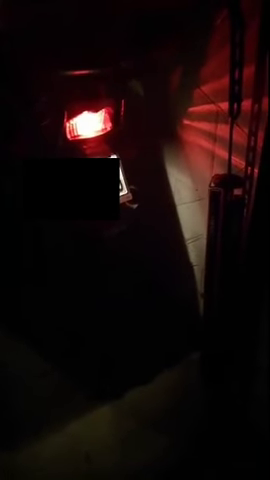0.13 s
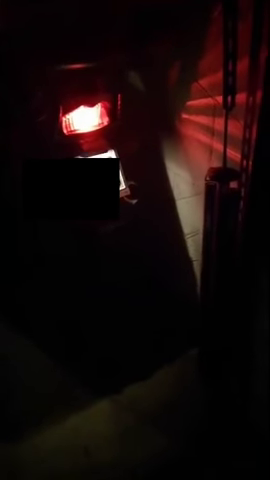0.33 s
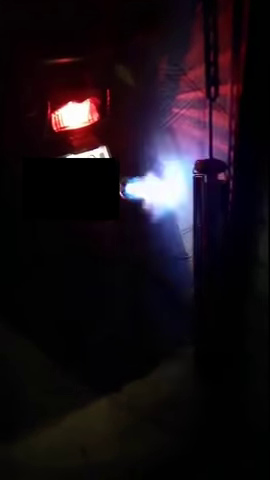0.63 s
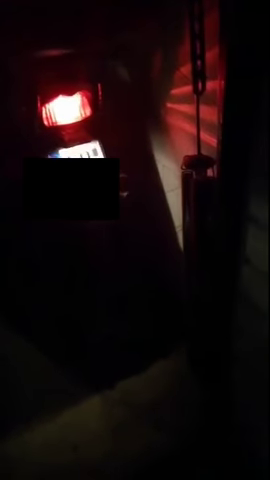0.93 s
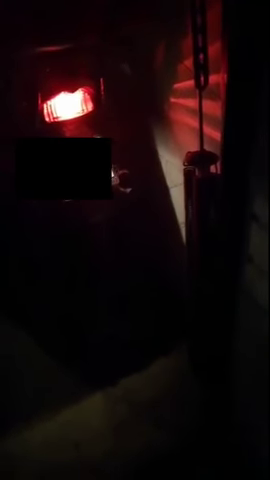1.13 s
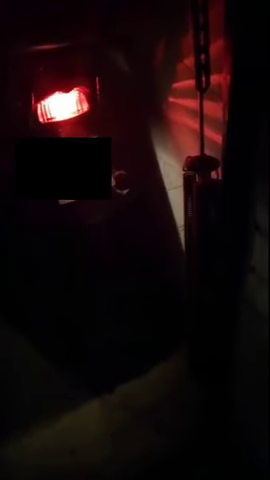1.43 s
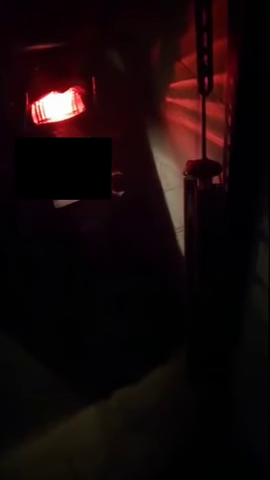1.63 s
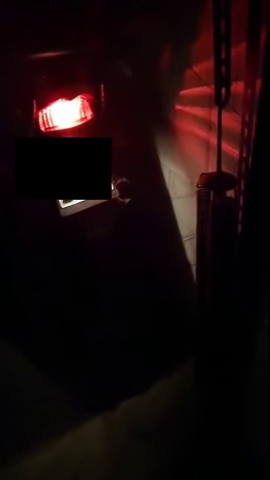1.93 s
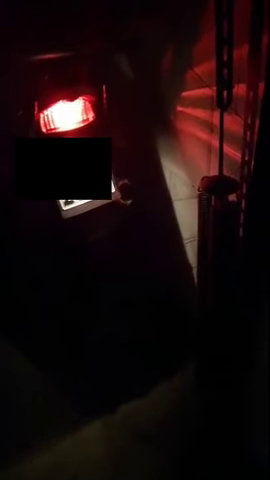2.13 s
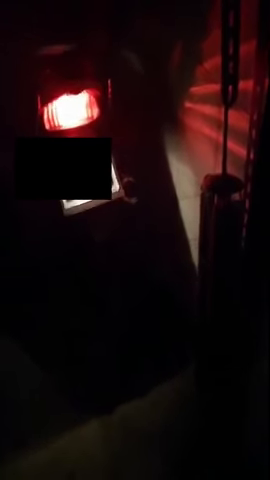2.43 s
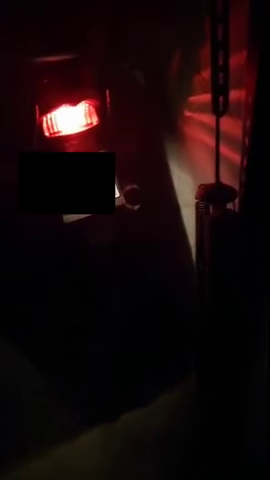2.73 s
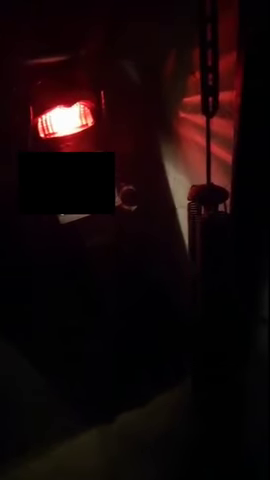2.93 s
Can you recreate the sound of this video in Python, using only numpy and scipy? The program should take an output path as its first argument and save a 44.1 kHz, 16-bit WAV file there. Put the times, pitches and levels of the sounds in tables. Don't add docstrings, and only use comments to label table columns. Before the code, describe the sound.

A four-cylinder motorcycle snarls through four quick revs with sharp exhaust pops in a hard-walled passage

```python
import sys
import numpy as np
from scipy import signal
from scipy.fft import rfft, irfft, next_fast_len
from scipy.io import wavfile
from scipy.ndimage import uniform_filter1d

SR = 44100
rng = np.random.default_rng(int(sys.argv[2]) if len(sys.argv) > 2 else 0)


def wav_out(sig):
    wavfile.write(sys.argv[1], SR, np.round(np.clip(np.atleast_2d(sig).T, -1, 1) * 32767).astype(np.int16))


def convert_level_to_amplitude(level_db):
    exponent = np.asarray(level_db, float) / 20
    return 10 ** exponent


N = 136710
HZ = np.fft.rfftfreq(next_fast_len(N + SR // 2), 1 / SR)
MID_HZ = 287.6

# throttle_opens_s, start_speed_hz, top_speed_hz, extra_strength_near_top_db, burble_returns_s
REVS = [
    (.08, 194.3, 361.3, 1.2, 0.47),
    (.935, 212.7, 360, -0.5, 1.25),
    (1.75, 215.8, 371.7, 5, 2.15),
    (2.53, 219, 378.3, 7, 2.2),
]
# pitch_hz, width_hz, level_db
PIPE_MODES = [(95, 31, -7.5), (172.8, 23, -3), (234.6, 40.7, 1.64), (290.3, 59.3, 1), (339.5, 65.6, 1),
              (465.7, 75, 4.5), (677, 72, -5.5), (799, 99, 1), (922, 113, -1), (1034, 146, -2.5),
              (1305, 310, -1), (1593, 290, -0.5), (1830, 190, -0.5), (2103, 540, -3.5)]
# pitch_hz, level_db
ROAR_COLOUR = [(300, -2.5), (600, -26), (1000, -6.5), (1400, 6.3), (2000, -6.5), (2400, 2.5), (3500, -7.5),
               (6000, -11.5)]
# pitch_hz, level_db
HISS_COLOUR = [(300, -32), (500, 4), (1000, 7), (2200, 10), (3000, 1.5), (4200, 4.5), (5500, -4)]
# start_s, peak_db, crack_db, thump_db (crack and thump relative to the peak)
GAS_POPS = [(0.028, -44.5, -18, 13), (0.068, -22.5, -23, 1.5), (0.558, -11, -6, -35),
            (.586, -0.5, -8.5, -4.5), (0.606, -15, -31, -4), (0.905, -15, -4.5, -25.5),
            (1.266, -4, -0.5, -19.5), (1.292, -11.5, -3.5, -12), (1.323, -2.5, 6, -15.5),
            (1.515, -6.5, -0.5, -27), (1.671, -11, -4.5, -15), (1.726, -10, -3, -12.5),
            (2.172, -7.5, -15, -10), (2.181, -1, -5.5, -10), (2.205, -24, -6, -10), (2.28, -9, -1, -16.5),
            (2.381, -35.5, -10, -16), (2.427, -13, -19, -18), (2.499, -9, -20.5, -19),
            (2.923, -3, 7.5, -28.5), (3.019, -2.5, 2, -20.5)]
# pitch_hz, time_to_fall_60_db_s
ECHO_TIMES = [(100, 0.11), (400, 0.11), (1500, 0.41), (5000, 0.56)]
# pitch_hz, level_db
ECHO_COLOUR = [(60, -16.5), (150, -43.5), (300, -10), (700, 0), (2000, -2.5), (5000, 3.5)]


def evened(x):
    return x / np.sqrt(np.mean(x ** 2) + 1e-20)


def read(points, hz):
    f, value = np.transpose(points)
    return np.interp(np.log(hz + 1), np.log(f + 1), value)


def colour(x, response):
    n = next_fast_len(N + SR // 2)
    return irfft(rfft(x, n) * response, n)[..., :N]


def drift(seconds):
    size = max(round(seconds * SR), 2)
    once = uniform_filter1d(rng.standard_normal(N), size)
    return evened(uniform_filter1d(once, size))


def ramp(t, start, length):
    return np.sin(np.pi / 2 * np.clip((t - start) / length, 0, 1)) ** 2


def lagging(x, seconds):
    keep = np.exp(-1 / (seconds * SR))
    return signal.lfilter([1 - keep], [1, -keep], x)


def controls():
    first_hz, last_hz = 204.2, 270.4
    rise_s, sag_s, near_top_s = 0.24, 0.66, 0.078
    lead_s, hold_s, open_s, shut_s = 0.015, 0.18, 0.07, 0.06
    cut_delay_s, cut_fade_s, return_fade_s = 0.058, 0.014, 0.059
    t = np.arange(N) / SR
    hz = np.interp(t, [0, REVS[0][0]], [first_hz, REVS[0][1]])
    ends = [row[:2] for row in REVS[1:]] + [(N / SR, last_hz)]
    load, push_db, cut = np.zeros(N), np.zeros(N), np.zeros(N)
    for (start, low_hz, top_hz, extra_db, back), (end, end_hz) in zip(REVS, ends):
        top = start + rise_s
        sag = np.expm1(-np.maximum(t - start - rise_s, 0) / sag_s) / np.expm1(-(end - start - rise_s) / sag_s)
        speed = low_hz + (top_hz - low_hz) * ramp(t, start, rise_s) + (end_hz - top_hz) * sag
        hz = np.where(t >= start, speed, hz)
        shut = ramp(t, start + hold_s - lead_s, shut_s)
        load += ramp(t, start - lead_s, open_s) * (1 - shut)
        push_db += extra_db * np.exp(-((t - top) / near_top_s) ** 2)
        cut += ramp(t, start + hold_s + cut_delay_s, cut_fade_s) * (1 - ramp(t, back, return_fade_s))
    hz = uniform_filter1d(hz, size=SR // 25, mode="nearest")
    return hz, load, push_db, cut


def firing(hz, load, bloom, push_db, turns):
    tone_shut_db, tone_open_db, wobble_db = -18, -8.5, 2.5
    tilt_shut_db, tilt_open_db, sharp_db_per_oct = -17, -3.5, 19
    half_db, half_fade_db, quarter_db = -12.5, -1.2, -21
    shut_db = tilt_shut_db + sharp_db_per_oct * np.log2(hz / MID_HZ)
    tilt = np.log2(convert_level_to_amplitude(shut_db + (tilt_open_db - shut_db) * bloom ** 0.24))
    out = np.zeros(N)
    for k in np.r_[.25:3:.25, 3:9:.5]:
        if k % 1 == 0:
            db = 0
        elif k % 0.5 == 0:
            db = half_db + half_fade_db * k
        else:
            db = quarter_db
        phase = k * turns + (k % 1 > 0) * rng.random()
        out += convert_level_to_amplitude(db) * np.exp(tilt * np.log(max(k, 1))) * np.cos(2 * np.pi * phase)
    level_db = tone_shut_db + (tone_open_db - tone_shut_db) * load ** 0.6
    level_db = level_db + push_db + wobble_db * drift(0.011)
    return out * convert_level_to_amplitude(level_db) * np.sqrt(2)


def pipe():
    response = 0
    for k, (f, width, db) in enumerate(PIPE_MODES):
        mode = 1j * HZ * width / (f * f - HZ * HZ + 1j * HZ * width)
        response = response + (-1) ** k * convert_level_to_amplitude(db) * mode
    return response


def howl(hz, turns):
    level_db, db_per_oct, tilt_db, waver_db = -25.5, 26, -1.2, 3.0
    out = np.zeros(N)
    for k in range(2, 8):
        strength = convert_level_to_amplitude(tilt_db * k + waver_db * drift(0.018))
        out += strength * np.cos(2 * np.pi * (k * turns + rng.random()))
    return out * convert_level_to_amplitude(level_db + db_per_oct * np.log2(hz / 340))


def roar(hz, load, turns):
    shut_db, open_db, db_per_oct, flicker_db = -28.5, -17, 18, 2.5
    puff_share = 0.51
    gate = 1 - puff_share + puff_share * 3 * np.exp(-(turns % 1) / 0.33)
    puffs = gate * rng.standard_normal(N) * convert_level_to_amplitude(flicker_db * drift(0.0041))
    db = shut_db + (open_db - shut_db) * load
    db = db + db_per_oct * np.log2(hz / MID_HZ) * (1 - 0.43 * load)
    return evened(colour(puffs, convert_level_to_amplitude(read(ROAR_COLOUR, HZ)))) * convert_level_to_amplitude(db)


def hiss(hz):
    level_db, db_per_oct, lag_s, flicker_db = -27, 18, 0.017, 1.8
    octaves = lagging(np.log2(hz / hz[0]), lag_s) + np.log2(hz[0] / MID_HZ)
    noise = rng.standard_normal(N) * convert_level_to_amplitude(flicker_db * drift(0.0067))
    noise = colour(noise, convert_level_to_amplitude(read(HISS_COLOUR, HZ)))
    return evened(noise) * convert_level_to_amplitude(level_db + db_per_oct * octaves)


def burble(load, cut):
    level_db, open_db, cut_db, spread_db = -25, 2, -32, 2.8
    kicks_per_s, soft_above_hz = 140, 352
    sizes = convert_level_to_amplitude(spread_db * np.minimum(rng.exponential(1, N), 4))
    kicks = (rng.random(N) < kicks_per_s / SR) * sizes * rng.choice([-1, 1], N)
    low = colour(kicks + 0.03 * rng.standard_normal(N), 1 / (1 + 1j * HZ / soft_above_hz) ** 2)
    return evened(low) * convert_level_to_amplitude(level_db + cut_db * cut + open_db * load)


def pops():
    pulse_s, crack_s, thump_s = 0.00041, 0.0028, 0.011
    crack_low_hz, crack_high_hz, thump_hz = 500, 2300, 59
    blow, air = np.zeros(N + SR), np.zeros(N + SR)
    t = np.arange(SR // 10) / SR
    u = t / pulse_s
    b, a = signal.butter(2, [crack_low_hz, crack_high_hz], "band", fs=SR)
    noises = evened(signal.lfilter(b, a, rng.standard_normal((len(GAS_POPS), len(t)))))
    pulse = 2.51 * u * np.exp(1 - u)
    thump = np.sin(2 * np.pi * thump_hz * t) * np.exp(-t / thump_s)
    for (start, db, crack_db, thump_db), noise in zip(GAS_POPS, noises):
        first = round(start * SR)
        at = slice(first, first + len(t))
        crack = 0.6 * noise * np.exp(-t / crack_s) * np.minimum(u, 1)
        blow[at] += convert_level_to_amplitude(db) * pulse
        air[at] += convert_level_to_amplitude(db + thump_db) * thump
        air[at] += convert_level_to_amplitude(db + crack_db) * crack
    return blow[:N], air[:N]


def passage(x):
    taps = np.zeros((2, SR // 2))
    at = np.arange(200, SR // 2 - 20, 20) + rng.integers(0, 20, (2, (SR // 2 - 201) // 20))
    np.put_along_axis(taps, at, rng.choice([-1., 1.], at.shape), 1)
    hz, t, z = signal.stft(taps, SR, nperseg=256)
    fade = convert_level_to_amplitude(-60 * t / read(ECHO_TIMES, hz)[:, None])
    tail = signal.istft(z * fade, SR, nperseg=256)[1]
    tail = tail / np.linalg.norm(tail[0])
    wet = signal.fftconvolve(x[None], tail, axes=1)[:, :N]
    return colour(wet, convert_level_to_amplitude(read(ECHO_COLOUR, HZ)))


def scene():
    hz, load, push_db, cut = controls()
    bloom = np.minimum(load, lagging(load, 0.045))
    turns = np.cumsum(hz * (1 + 0.004 * drift(0.005))) / SR
    blow, air = pops()
    stumble = convert_level_to_amplitude(-0.36 * np.maximum(222.3 - hz, 0) * (1 - load))
    misfires = burble(load, cut) * stumble ** 0.75
    pulses = firing(hz, load, bloom, push_db, turns) * stumble
    piped = colour(pulses + blow + 2.1 * misfires, pipe())
    open_air = 0.4 * blow + air + 0.43 * misfires
    bike = piped + open_air + howl(hz, turns) + roar(hz, bloom ** 1.2, turns) + hiss(hz)
    late_share, late_samples = 0.71, 26
    left = late_share * np.roll(bike, late_samples) + (1.2 - late_share) * bike
    return np.array([left, bike]) * convert_level_to_amplitude(-3.0) + passage(bike)


def top_cut(x):
    return signal.sosfilt(signal.butter(12, 15870, fs=SR, output="sos"), x)


def record(dry):
    treble_hz, bass_hz, limit = 5540, 36, 0.99
    dull = signal.firwin(601, treble_hz, window=("kaiser", 11), fs=SR)
    x = signal.oaconvolve(dry, dull[None], "same", axes=1)
    x = colour(x, 1j * HZ / (bass_hz + 1j * HZ))
    mix = np.clip(x, -limit, limit)
    return top_cut(mix)


dry = scene()
out = record(dry)
wav_out(out)
```